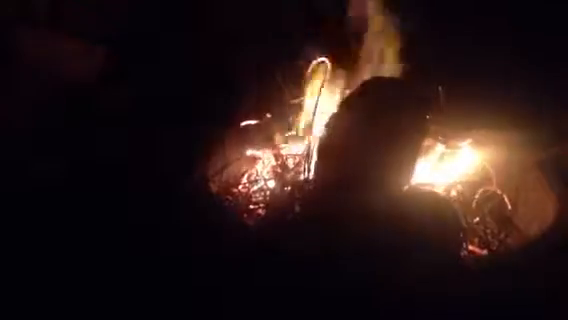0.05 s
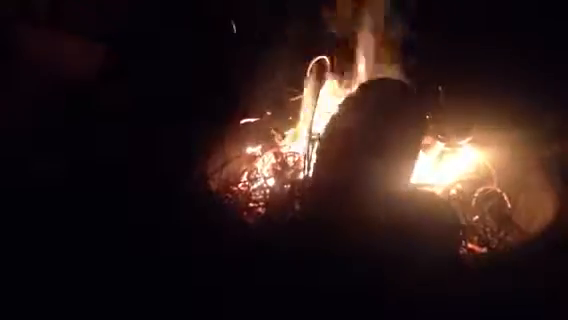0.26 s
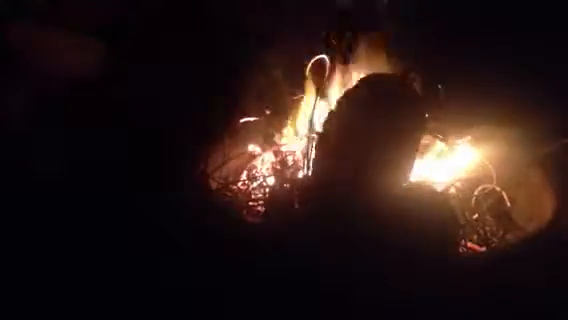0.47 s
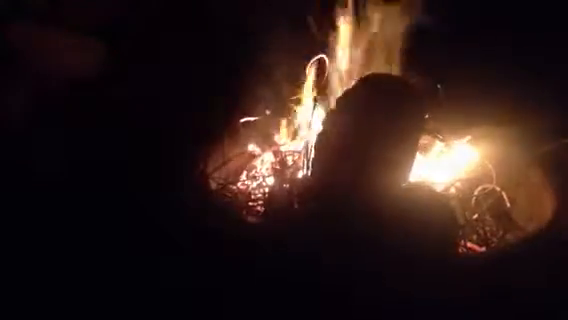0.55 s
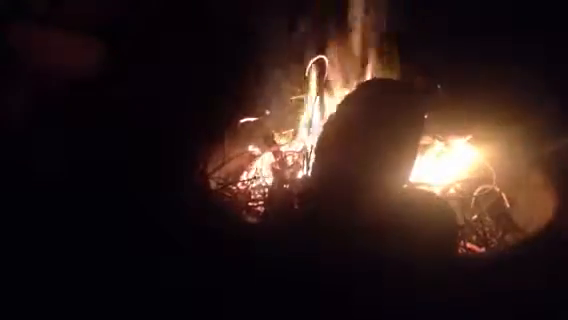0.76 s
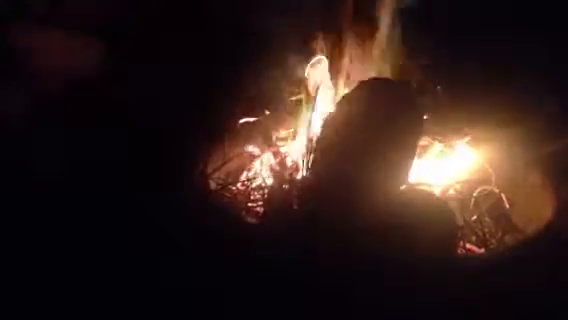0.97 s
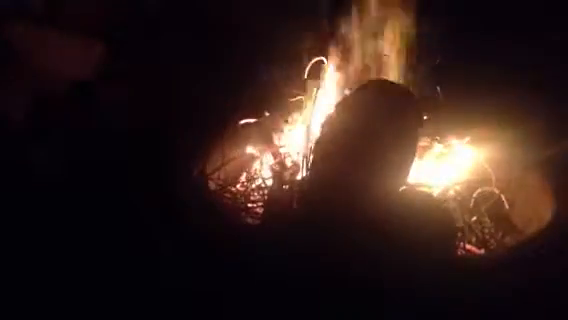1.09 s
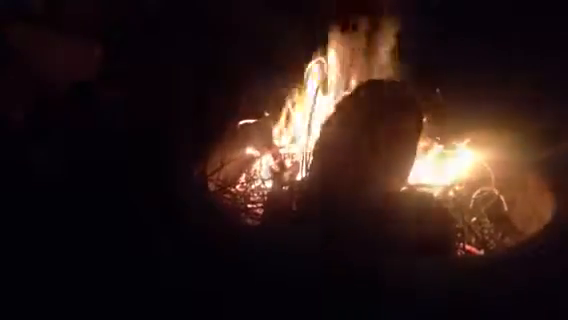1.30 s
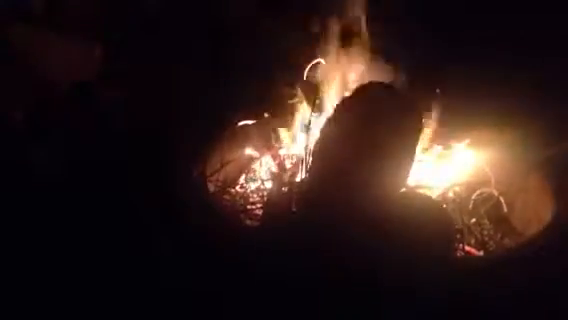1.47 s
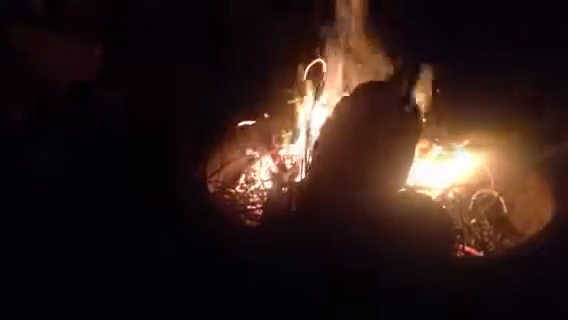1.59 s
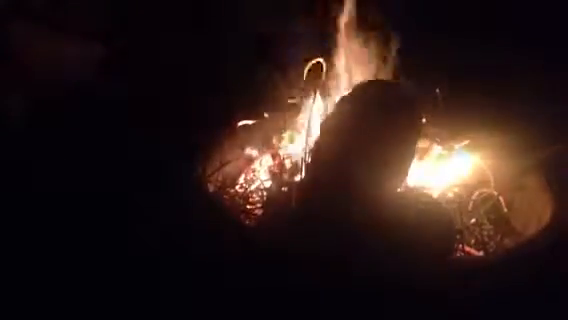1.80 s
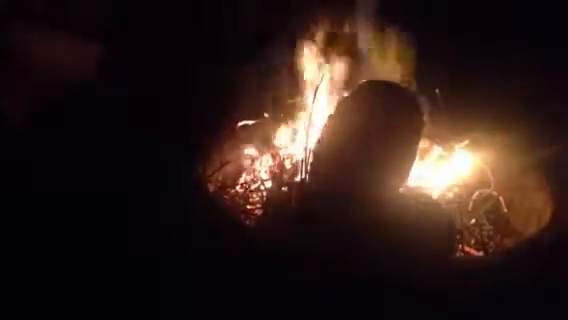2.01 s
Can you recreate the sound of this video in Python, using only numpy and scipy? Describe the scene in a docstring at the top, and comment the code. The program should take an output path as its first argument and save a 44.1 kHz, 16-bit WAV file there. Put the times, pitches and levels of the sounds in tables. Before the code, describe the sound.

A bonfire heard from a few steps away outdoors: a very quiet flame rush and thin hiss, a loud sharp pop almost at once, then small dry snaps, with a second, weaker bright crack late on.

```python
"""A bonfire burns outdoors at night, heard from a few steps away.
Throughout: coloured noise for the flames' low rush, a thin hiss and soft midrange; random ember ticks.
At 0.23 s a gas pocket bursts in a log: one loud filtered impulse. From 0.39 s wood fibres snap as
splintering, ringing clicks, the strongest at 1.51 s. A faint wavering hum rises from 1.25 to 1.45 s.
Every crack bounces off the ground and scatters among the logs and surroundings."""
import sys
import numpy as np
from scipy import signal
from scipy.fft import rfft, irfft, next_fast_len
from scipy.io import wavfile
from scipy.ndimage import uniform_filter1d

SR = 44100
rng = np.random.default_rng(int(sys.argv[2]) if len(sys.argv) > 2 else 0)


def wav_record(signal):
    """Record a signal, one row per channel, as 16-bit PCM in the file named by sys.argv[1]."""
    frames = np.transpose(np.atleast_2d(signal))
    bounded = np.clip(frames, -1, 1)
    # unit amplitude maps onto the largest positive 16-bit level
    quanta = np.round(bounded * 32767).astype(np.int16)
    wavfile.write(sys.argv[1], SR, quanta)


N = 90404
T = np.arange(N) / SR

# midrange rush, relative spectrum [f/Hz, level/dB per Hz]
AIR_SPECTRUM = [(40, -22), (150, -15.5), (450, -2), (650, -1.5), (950, 2.5), (1400, -4), (2200, -12),
                (4000, -18.5)]
# midrange level [t/s, level/dB]
AIR_LEVEL = [(0, -64), (.8, -63.5), (1.1, -63), (1.4, -63.5), (1.52, -61.5), (2.05, -63.5)]
# hum level [t/s, level/dB]
HUM_LEVEL = [(1.25, -70), (1.45, -64)]
HUM_HZ, HUM_WAVER_RMS_HZ, HUM_WAVER_CUTOFF_HZ = 140.35, 2.5, 6.6

# low rush of the flames, relative spectrum [f/Hz, level/dB per Hz]
RUSH_SPECTRUM = [(25, -55), (55, -31.5), (80, -19), (100, -16), (138, -4), (175, -1.5), (210, 2), (335, -3),
                 (390, -12), (430, -12.5), (480, -33), (1000, -34), (4000, -61)]
# rush level as the flames swell and sink [t/s, level/dB]
RUSH_LEVEL = [(0.0, -58), (0.12, -56), (0.12, -54.5), (0.75, -54), (0.76, -59.5), (0.8, -50.5),
              (0.83, -59.5), (0.85, -51), (0.88, -55.5), (1.43, -53.5), (1.47, -51.5), (1.56, -59),
              (1.59, -54), (1.8, -55), (1.81, -60), (1.93, -53.5), (1.96, -61.5), (2.05, -54.5)]
RUSH_LEVELLING_S = 0.07
# hiss of the hot wood, relative spectrum [f/Hz, level/dB per Hz]
HISS_SPECTRUM = [(1000, -12.5), (2500, 2.5), (3400, 2), (4300, 5), (5300, -3.5), (7000, 3), (8400, 0.5),
                 (10000, -1), (12500, -10.5), (14200, -23), (15000, -5)]
HISS_DB, HISS_FLUTTER_RMS_DB, HISS_FLUTTER_CUTOFF_HZ = -69.5, 1, 24
WHISTLE_HZ, WHISTLE_WIDTH_HZ, WHISTLE_DB = 8270, 130, -82

TICKS_PER_S, TICK_MIN_DB, TICK_SPREAD_DB, TICK_WIDTH_HZ = 20, -63, 5, 5400
# snapping fibres [t/s, crack level/dB, ring f/Hz, ring width/Hz, splinters re crack/dB, lower edge f/Hz]
FIBRE_SNAPS = [(0.3915, -43, 9500, 5000, -18, 4500), (0.4079, -40, 9000, 6000, -13, 4000),
               (0.6193, -43.5, 7100, 3000, -10, 3000), (0.6928, -42.5, 6500, 4000, -7, 2500),
               (0.9655, -37.5, 11300, 900, 0, 2500), (0.9668, -28.5, 9500, 1500, -13, 7000),
               (1.362, -31.5, 7520, 900, -8, 3000), (1.3914, -44, 9500, 4000, -1, 4500),
               (1.4012, -42, 6000, 4000, -6, 2500), (1.5063, -18, 7330, 2940, -30, 1000),
               (1.5565, -43.5, 9000, 5000, -14, 5000), (1.6789, -38.5, 5700, 8000, 1, 1900),
               (1.7969, -43.5, 11000, 6000, -6, 2000), (1.8944, -43, 9100, 6000, -17, 3000),
               (2.0060, -48, 6460, 900, 1, 3000), (2.0153, -46, 6800, 2000, -1, 3000),
               (2.0250, -38, 5500, 6000, -1, 2000)]
SNAP_CRACK_GAIN = 0.5  # unpitched part
SPLINTERS_PER_S, SPLINTER_T60_S = 1100, 0.017
# gas pocket bursts [t/s, impulse level/dB]
GAS_POPS = [(0.2298, 0.5)]
# filter response of a burst [f/Hz, level/dB]
POP_RESPONSE = [(60, -30), (430, -36), (530, -8), (700, -6), (880, 0), (1500, -2.5), (1850, -2.5),
                (2300, 0), (4200, 3.5), (5400, 0), (7500, 4), (10200, -0.5), (11300, -5.5), (14300, -8)]

GROUND_DELAY_S, GROUND_DB, GROUND_CUTOFF_HZ = 0.0021, -12.5, 6000
# scatter among logs, then surroundings [delay t/s, T60 t/s, level before low-pass/dB, cutoff f/Hz]
SCATTER_TAILS = [(.0003, 0.007, -10, 13100), (.002, 0.023, -15.5, 9400), (.005, .14, -23, 16000)]
# microphone dips and peak [f/Hz, width/Hz, level/dB]
MIC_RESPONSE = [(2786, 310, -5.5), (5000, 290, -9), (12350, 2750, -7), (14700, 700, 3)]
BAND_LIMIT_HZ = 15250


def from_db(db):
    """Decibels to amplitude gain."""
    return 10 ** (np.asarray(db) / 20)


def rms_one(x):
    """Scale to rms 1."""
    return x / np.sqrt(np.mean(x ** 2) + 1e-30)


def level_gain(points):
    """Gain over time, interpolated in dB between (s, dB) points."""
    return from_db(np.interp(T, *np.transpose(points)))


def cut(x, hz, kind, order=2):
    """Butterworth low- or high-pass."""
    sos = signal.butter(order, min(hz, .45 * SR), kind, fs=SR, output="sos")
    return signal.sosfilt(sos, x + 1e-18)


def colour(x, points):
    """Causal minimum-phase filter with the given (Hz, dB) response, via the folded cepstrum."""
    hz, db = np.transpose(points)
    size = next_fast_len(N) * 2
    grid_hz = np.maximum(np.arange(size // 2 + 1) * SR / size, 1)
    response_db = np.interp(np.log(grid_hz), np.log(hz), db)
    cepstrum = irfft(np.log(from_db(response_db)))
    cepstrum[1:size // 2] *= 2
    cepstrum[size // 2 + 1:] = 0
    return irfft(rfft(x, size) * np.exp(rfft(cepstrum)))[:N]


def click(start_s, db):
    """A one-sample pressure impulse."""
    return from_db(db) * (np.arange(N) == round(start_s * SR))


def ring(x, hz, width_hz):
    """Damped two-pole resonance that keeps the energy of a click."""
    r = np.exp(-np.pi * width_hz / SR)
    poles = [1, -2 * r * np.cos(2 * np.pi * hz / SR), r * r]
    return np.sqrt((1 - r * r) / 2) * signal.lfilter([1, 0, -1], poles, x + 1e-18)


def dying(x, start_s, t60_s):
    """Gate on at start_s, decay exponentially; total energy that of a unit click."""
    decay = np.exp(-np.log(1000) * np.abs(T - start_s) / t60_s)
    return rms_one(x * (T >= start_s) * decay) / np.sqrt(N)


def midrange_air():
    """Smooth midrange noise that swells a little."""
    return level_gain(AIR_LEVEL) * rms_one(colour(rng.standard_normal(N), AIR_SPECTRUM))


def hum():
    """Faint low sine with randomly wavering frequency."""
    waver = rms_one(cut(rng.standard_normal(N), HUM_WAVER_CUTOFF_HZ, "low"))
    hz = HUM_HZ + HUM_WAVER_RMS_HZ * waver
    tone = np.sin(2 * np.pi * np.cumsum(hz) / SR)
    return level_gain(HUM_LEVEL) * rms_one(tone)


def flame_rush():
    """Burning gas: low turbulent noise, levelled by its moving power, then swelling and sinking."""
    noise = colour(rng.standard_normal(N), RUSH_SPECTRUM)
    power = uniform_filter1d(noise ** 2, int(RUSH_LEVELLING_S * SR))
    steady = rms_one(noise / np.sqrt(power + 1e-30))
    return steady * level_gain(RUSH_LEVEL)


def wood_whistle():
    """Faint narrow band in the hiss: noise through one resonance."""
    return from_db(WHISTLE_DB) * rms_one(ring(rng.standard_normal(N), WHISTLE_HZ, WHISTLE_WIDTH_HZ))


def wood_hiss():
    """Hot wood: thin turbulent noise with random level flutter."""
    flutter = rms_one(cut(rng.standard_normal(N), HISS_FLUTTER_CUTOFF_HZ, "low"))
    noise = rms_one(colour(rng.standard_normal(N), HISS_SPECTRUM))
    return from_db(HISS_DB) * noise * from_db(HISS_FLUTTER_RMS_DB * flutter)


def embers():
    """Faint damped ticks at random times, sizes and pitches."""
    born = rng.random(N) < TICKS_PER_S / SR
    excess_db = TICK_SPREAD_DB * np.minimum(rng.exponential(1, N), 3.5)
    impulses = born * from_db(TICK_MIN_DB + excess_db)
    pitches_hz = np.geomspace(4000, 11000, 10)
    pitch_index = rng.integers(0, len(pitches_hz), N)
    return sum(ring(impulses * (pitch_index == k), hz, TICK_WIDTH_HZ) for k, hz in enumerate(pitches_hz))


def snaps():
    """Each breaking fibre cracks, splinters briefly and rings at its own pitch."""
    out = 0
    for start_s, db, ring_hz, width_hz, splinter_db, low_hz in FIBRE_SNAPS:
        # tiny after-cracks along the fibre
        grains = (rng.random(N) < SPLINTERS_PER_S / SR) * rng.standard_normal(N)
        splinters = from_db(db + splinter_db) * dying(grains, start_s, SPLINTER_T60_S)
        crack = click(start_s, db) + splinters
        snap = ring(crack, ring_hz, width_hz) + SNAP_CRACK_GAIN * crack
        out = out + cut(snap, low_hz, "high")
    return out


def pops():
    """A bursting gas pocket sends out one broad, sharp pulse, here of inverted polarity."""
    impulses = sum(click(start_s, db) for start_s, db in GAS_POPS)
    return -colour(impulses, POP_RESPONSE)


def outdoors(x):
    """Direct sound, a duller ground bounce and short diffuse tails."""
    bounce = cut(click(GROUND_DELAY_S, GROUND_DB), GROUND_CUTOFF_HZ, "low", order=1)
    response = click(0, 0) + bounce
    for delay_s, t60_s, db, cutoff_hz in SCATTER_TAILS:
        tail = dying(rng.choice([-1, 1], N), delay_s, t60_s)
        response = response + from_db(db) * cut(tail, cutoff_hz, "low", order=1)
    return signal.fftconvolve(x, response)[:N]


def scene():
    """Cracks in the open air over the flames and the background."""
    cracks = outdoors(pops() + snaps() + embers())
    flames = flame_rush() + wood_whistle() + wood_hiss()
    background = hum() + midrange_air()
    return (cracks + flames + background)[None]


def record(dry):
    """Microphone's resonant dips and a peak in series, then a steep upper band limit."""
    for hz, width_hz, db in MIC_RESPONSE:
        b, a = signal.iirpeak(hz, hz / width_hz, fs=SR)
        dry = dry + (from_db(db) - 1) * signal.lfilter(b, a, dry)
    return signal.sosfilt(signal.butter(20, BAND_LIMIT_HZ, fs=SR, output="sos"), dry)


dry = scene()
out = record(dry)
wav_record(out)
```